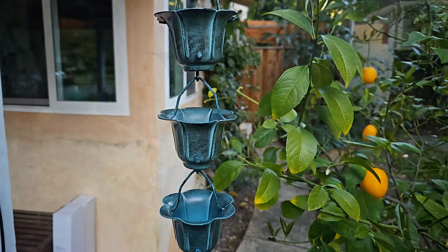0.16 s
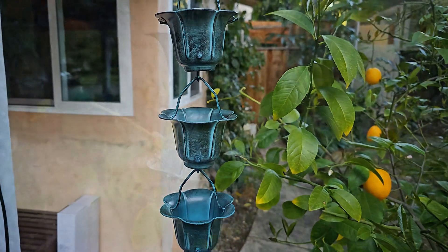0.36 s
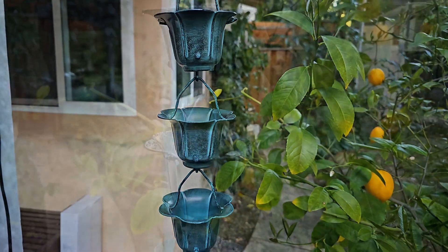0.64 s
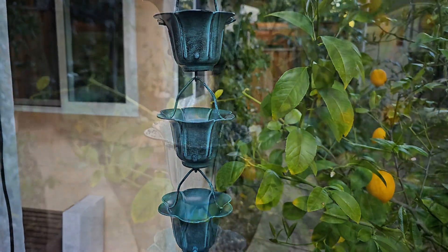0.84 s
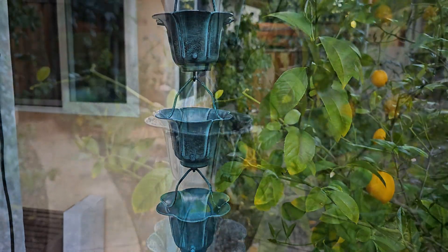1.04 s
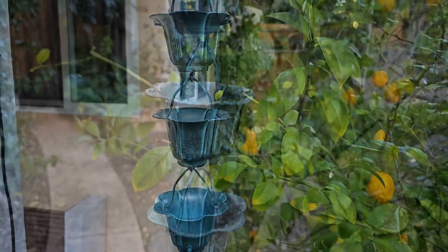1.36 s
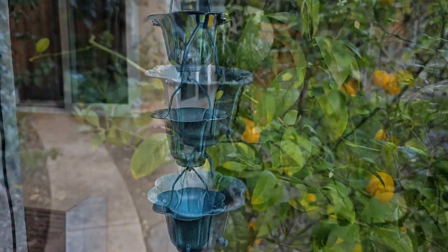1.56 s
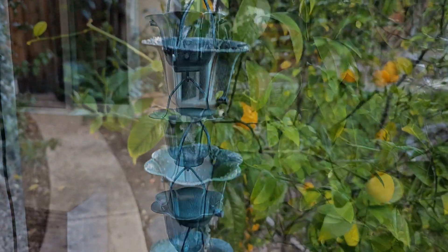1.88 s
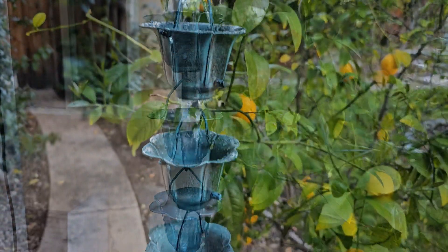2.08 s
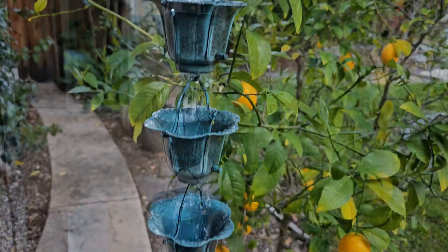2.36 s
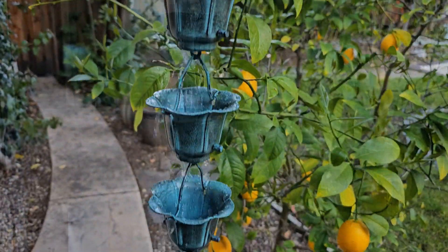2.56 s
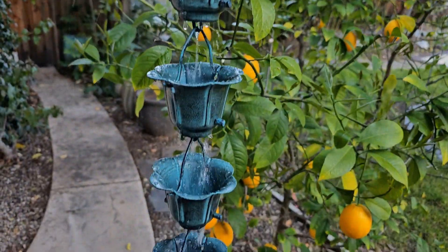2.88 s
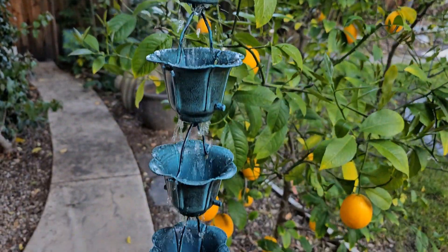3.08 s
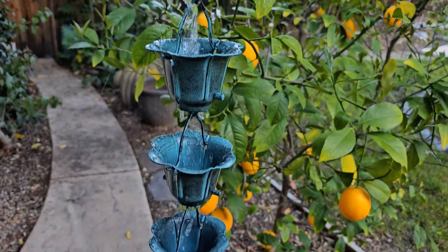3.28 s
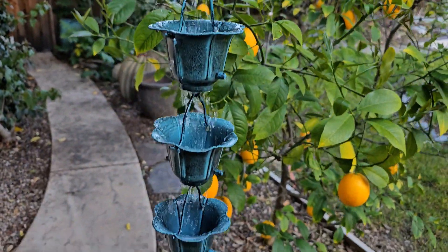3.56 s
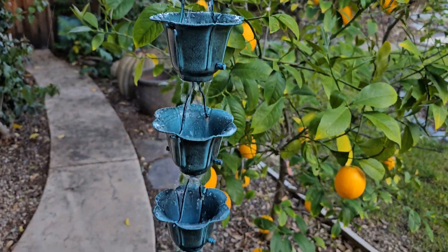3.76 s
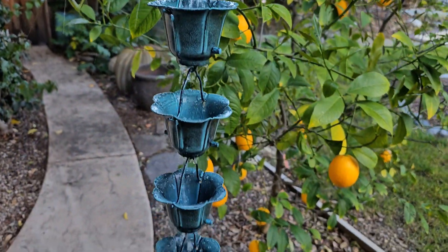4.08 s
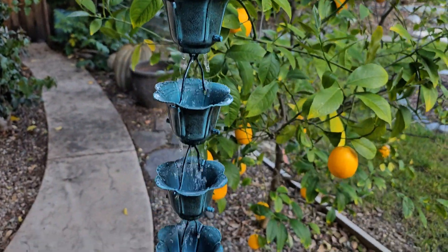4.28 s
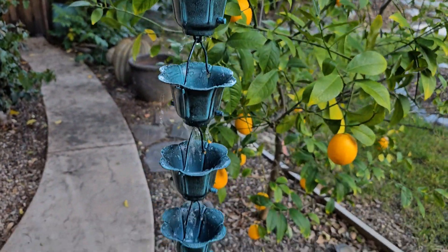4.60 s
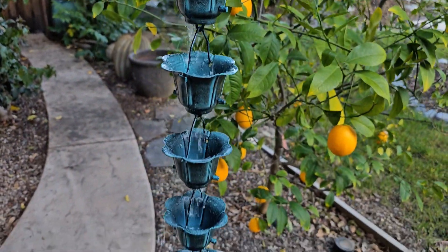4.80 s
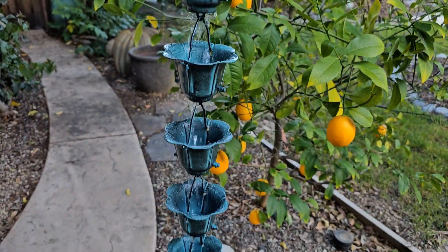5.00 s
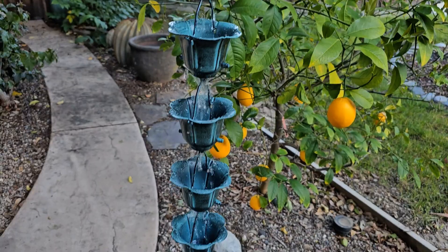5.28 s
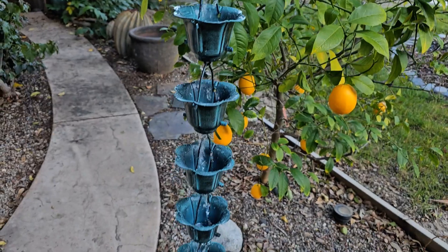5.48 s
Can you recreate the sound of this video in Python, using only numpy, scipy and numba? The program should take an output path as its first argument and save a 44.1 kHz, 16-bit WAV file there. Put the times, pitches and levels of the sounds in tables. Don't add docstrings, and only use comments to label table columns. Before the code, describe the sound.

Close outdoor stereo pickup of water running down a chain of metal cups. Irregular bright drips, tiny rising bubbles, crisp spray ticks and short metallic taps sit over thin pattering hiss. Low air puffs thump on the left in the first two seconds. A distant engine drops in pitch, then rises again, beside a faint drone and town rumble. The water gets busier near the end, with a brief gurgling spill about five seconds in.

```python
import sys
import numpy as np
from scipy import signal
from scipy.fft import rfft, irfft
from scipy.io import wavfile
from scipy.ndimage import uniform_filter1d
from numba import njit

SR = 44100
rng = np.random.default_rng(int(sys.argv[2]) if len(sys.argv) > 2 else 0)


def magnitude_from_level(level_db):
    exponent = np.asarray(level_db, float) / 20
    return 10 ** exponent


def wav_record(signal):
    frames = np.transpose(np.atleast_2d(signal))
    bounded = np.clip(frames, -1, 1)
    quanta = np.round(bounded * 32767).astype(np.int16)
    wavfile.write(sys.argv[1], SR, quanta)


N = 248724

# start_s, peak_db, bubble_hz, left_minus_right_db
CUP_DRIPS = [(0.0864, -45, 5430, 1), (0.105, -41.5, 7800, -9), (0.1241, -54, 8950, -6),
             (0.193, -41.5, 5260, -2), (0.2169, -41.5, 2890, -15), (0.2376, -36, 6370, -5),
             (0.7537, -46, 6050, -10), (1.1655, -50, 6500, -5), (1.3783, -54, 6040, -14),
             (1.426, -45, 6240, -3), (1.9869, -56, 4200, -10), (2.1786, -53, 3522, -6),
             (2.2975, -46, 4460, -6), (2.6549, -53, 7820, -11), (3.1767, -61, 4808, -1),
             (3.1964, -40, 7000, -3), (3.2525, -48, 4188, -1.5), (3.3208, -29, 5270, 5),
             (3.5818, -41, 8147, -12), (3.6704, -53, 7297, -11), (3.7426, -42.5, 4605, 0),
             (3.8134, -47, 5400, 4), (3.8617, -54, 3745, -13), (3.921, -53, 4580, 6),
             (4.1416, -45, 8320, -9), (4.5502, -45.5, 3105, -14), (4.8484, -46, 3784, -11),
             (5.2396, -46, 3080, -1), (5.3799, -43, 4844, 1), (5.6244, -47, 4940, 2)]
# start_s, peak_db, bubble_hz, left_minus_right_db
SPLASHES = [(0.4239, -56, 6100, -2.5), (1.4039, -49, 5840, 0), (1.705, -58, 4723, 3),
            (2.0813, -42, 6300, -4), (2.161, -52, 5200, 0), (2.1976, -40, 6800, -10),
            (2.334, -49.5, 6940, -10), (2.4404, -64, 2774, 0), (2.498, -66, 3207, -2),
            (2.7311, -59, 5616, -1.5), (2.818, -59, 3360, -6), (4.0175, -55, 3274, -2),
            (4.2128, -60, 8330, -6), (4.363, -41, 4670, 0), (4.4528, -55, 5346, -6),
            (4.7449, -55, 3300, -6), (4.779, -59, 8010, -9.5), (4.82, -48.5, 4294, -9),
            (4.9485, -58, 3164, -10), (4.978, -58, 3040, -10), (1.4165, -49.5, 7500, -15),
            (2.228, -48, 7060, -2), (4.9033, -67, 6750, -3), (5.123, -54, 3000, -8),
            (.175, -52, 8100, -9), (5.4172, -53, 5170, -2), (5.5373, -58, 3870, -10)]
# start_s, peak_db, pitch_hz, left_minus_right_db
SPRAY_TICKS = [(0.162, -55, 11600, -6), (0.378, -54, 12060, -9), (0.5168, -54, 12900, -8),
               (0.7082, -41, 15700, 4), (0.8332, -48.5, 13000, -8), (0.8754, -49, 15150, 5),
               (0.937, -43, 14700, -5), (1.1653, -48, 14760, -5), (1.4163, -58, 11000, -15),
               (1.587, -45, 15500, 2), (1.6397, -47.5, 11700, -9), (1.8991, -55, 12860, -12),
               (2.0791, -52, 15420, -4), (2.1969, -48, 15400, 5), (2.226, -48, 15400, -3),
               (2.272, -56, 11300, -14), (2.9047, -47.5, 12710, -4), (2.9425, -42, 15300, 5),
               (3.0081, -45, 15640, 5), (3.1967, -53, 13400, -4), (3.5821, -45, 14610, -3),
               (3.8676, -47, 14230, -4), (3.9936, -44, 15400, 1), (4.3635, -44, 14980, .5),
               (4.704, -42, 14200, 1), (5.1243, -45, 15700, .5), (5.1692, -49, 15300, -2),
               (5.239, -52, 14600, -2), (5.2642, -55, 11920, -5), (5.4412, -47, 14080, -6)]
# start_s, peak_db, pitch_hz, left_minus_right_db
GLUG_BUBBLES = [(0.216, -42, 1590, 4), (3.3214, -39, 6470, -10), (3.3898, -46, 1695, -.5),
                (1.9885, -51, 3850, -10), (3.254, -45, 4235, -3), (3.7434, -48.5, 3846, -8),
                (3.7463, -49, 4800, 1), (3.8144, -42, 5380, 5), (4.849, -57, 3582, -9),
                (.2385, -48, 6560, -11), (4.376, -48, 1720, -9), (4.4525, -48, 1669, -2.5),
                (4.549, -48, 2097, -11), (5.014, -46.5, 1500, -4.5), (5.0381, -49, 3353, -13),
                (5.0604, -49, 3290, -11), (5.089, -50, 3455, -14), (5.1563, -49, 3230, -16),
                (2.2965, -46, 3480, -9), (5.0639, -46, 2068, -14), (5.0882, -46, 1851, -6),
                (5.1063, -44, 2031, -18), (5.1232, -43, 2000, -9), (5.156, -45, 2120, -12),
                (3.3208, -39.5, 4680, 0), (5.184, -46, 1546, -2.5), (5.452, -50.5, 2000, -11)]
# start_s, peak_db, pitch_hz, left_minus_right_db, ring_ms
RIM_RINGS = [(2.588, -60, 5500, 1, 64), (2.5, -52, 11500, -14, 19.4), (0.32, -52, 10200, -7, 15),
             (4.736, -51, 12800, 4, 25), (2.523, -57.5, 13000, -12, 18), (.134, -57, 13500, 0, 14),
             (0.36, -58, 11600, -8, 14), (0.35, -53, 12400, -8, 16), (.424, -64, 11600, -6, 14),
             (.483, -59, 11700, -10, 14), (.517, -52, 12900, -6, 20), (0.93, -58, 6000, -6, 22),
             (1.705, -56, 4700, 2, 37), (1.8, -52, 4680, -4, 12.3), (2.2, -51, 6900, -8.5, 33),
             (3.196, -52.5, 6140, -4, 11), (3.455, -61, 6200, -3, 20.6), (3.672, -56.5, 7300, -10, 33.5),
             (5.28, -52, 12050, -6, 15.8), (5.623, -51, 5400, 5, 14), (3.324, -53, 5250, 2, 59.4),
             (1.166, -58.5, 6300, -4, 26)]
# start_s, peak_db, low_hz, high_hz, left_minus_right_db
EARLY_TAPS = [(0.0868, -58, 8500, 15700, -13), (0.1242, -50, 5560, 13500, -14),
              (0.1931, -44, 5500, 11000, -12), (0.2175, -49, 3500, 15700, -1),
              (0.2524, -44, 2200, 5500, -3), (0.424, -55, 3500, 15700, 0), (0.5193, -50, 3500, 11000, -2),
              (0.644, -51, 2200, 8500, -5), (0.653, -52, 2220, 8500, -7), (0.66, -45, 3500, 15700, -4),
              (0.7089, -53, 3500, 11000, -1), (0.8945, -43, 8500, 15700, -4),
              (1.0157, -51, 8500, 13400, -10), (1.1655, -43.5, 11000, 13500, -13),
              (1.4043, -52, 3500, 11000, 2), (1.4258, -53, 8500, 15700, -11),
              (1.5614, -45, 8500, 15720, -5), (1.7999, -49, 8540, 15700, -2),
              (1.8992, -53, 13500, 15700, -14), (1.9107, -50, 11000, 15700, -12),
              (2.0164, -50, 5500, 15700, 3), (2.0873, -48, 3500, 10980, 1), (2.112, -48, 3500, 5500, 1),
              (2.1619, -47, 2200, 5500, -5), (2.1885, -45, 3500, 8500, 4), (2.1977, -44, 8500, 13500, -4),
              (2.228, -48, 3500, 13500, -13), (2.2419, -49, 11000, 15700, 8),
              (2.2718, -42, 11000, 13500, -14), (2.2963, -47, 3502, 11000, -5),
              (2.3088, -51, 2200, 5500, -3), (2.3336, -47, 5500, 11000, -14),
              (2.3556, -50, 5500, 13500, -14), (2.44, -50, 2200, 10960, 8), (2.4938, -47, 11020, 15700, -9),
              (2.5238, -58, 8500, 11030, -14), (2.7318, -53, 3500, 8500, 5), (2.819, -53, 2198, 5500, -2),
              (2.9368, -51, 11000, 15730, 7), (3.0785, -48, 8485, 13500, 1)]
# start_s, peak_db, low_hz, high_hz, left_minus_right_db
LATE_TAPS = [(3.1414, -52, 8500, 11010, -8), (3.1628, -49, 11000, 15700, 6), (3.1775, -48, 3495, 8500, 2),
             (3.3469, -47, 3475, 10970, -3), (3.3767, -48, 11000, 15700, -2), (3.4099, -49, 2200, 15700, 1),
             (3.5823, -40, 2198, 13470, -11), (3.6712, -49, 5500, 15700, -12),
             (3.743, -53, 8470, 10960, -14), (3.7505, -52, 2200, 3500, -7), (3.7605, -49, 2200, 15700, 8),
             (3.8687, -56, 3503, 5500, -4), (3.9211, -52, 5515, 15700, 2), (4.0168, -42, 3500, 15700, -4),
             (4.0343, -45, 11000, 15700, -7), (4.0876, -51, 8500, 13410, 8), (4.174, -51, 5475, 10990, -5),
             (4.2139, -50, 2200, 13500, -10), (4.2647, -48, 11050, 15700, 8),
             (4.3641, -50, 2195, 3500, -12), (4.3703, -50, 13500, 15700, 7.5), (4.376, -46, 2200, 3500, -8),
             (4.383, -48, 3500, 8500, 2), (4.4539, -51, 2200, 11000, -4), (4.5498, -50, 3513, 11020, -3),
             (4.608, -49, 2195, 5500, -8.5), (4.6588, -54, 3494, 8495, 7), (4.7986, -46, 8500, 15700, -10),
             (4.8485, -47, 2200, 3520, -13), (5.0717, -45, 3500, 15720, 1), (5.1252, -40, 3500, 13500, -5),
             (5.1573, -45, 3504, 5500, 3), (5.1697, -43.5, 2200, 11000, -8), (5.1827, -46, 2200, 13500, -9),
             (5.2296, -47, 2200, 15680, -9), (5.2391, -44.5, 2200, 11000, -11),
             (5.265, -52, 13500, 15700, 3), (5.3808, -50, 2200, 8490, -5), (5.4266, -45, 8500, 15700, -5),
             (5.4855, -49, 2200, 15670, -5)]
# time_s, level_db
CUP_SPILL = [
    (4.96, -70),
    (5.03, -59),
    (5.13, -57.5),
    (5.165, -54),
    (5.19, -56),
    (5.22, -69),
]
# start_s, peak_db, sign (direction and share of the push)
AIR_PUFFS = [
    (0.103, -20, 1),
    (0.615, -19, 0.18),
    (1.336, -24, 0.92),
    (1.502, -27.5, -0.91),
    (1.661, -34, -1),
    (1.93, -33, 0.93),
]
# frequency_hz, gain_db
LEFT_PORT = [(800, -7.5), (2600, -6), (3200, -8), (5300, 0), (6800, -8.5), (7300, -0.5), (8700, -11),
             (9600, -25), (10200, -30), (11000, -18), (11900, 2.5), (12400, -6), (13600, 2), (15600, 6)]
# frequency_hz, gain_db
RIGHT_PORT = [(800, -38), (3100, -6), (4900, -6), (5500, -1), (6300, 2), (6900, -0.5), (7400, 7),
              (8200, 4.5), (8800, 0.5), (9700, 0.5), (10150, -11), (10500, -2.5), (11600, 8), (13000, 0)]
# time_s, firing_hz, level_db, overtone_lift_db (its load)
ENGINE_RUN = [(0.0, 92.04, -37.5, -12), (0.3, 84, -41.5, -3), (0.7, 68, -50.5, 8.5),
              (0.84, 65.6, -37.5, -17.5), (1.0, 60.4, -57.5, 7.5), (1.26, 62.04, -39, -3.5),
              (1.42, 63.57, -34.5, 3), (1.58, 64.2, -30.5, -8.5), (1.82, 69.3, -45.5, 14),
              (2.05, 70.9, -41.5, 6), (2.22, 73.5, -31.5, -6.5), (2.66, 79, -45, 3), (3.2, 84.72, -42, 6),
              (3.6, 88.4, -36.5, 0.5), (4.2, 90.9, -37, -12), (5.06, 96.27, -37, -5),
              (5.3, 92.4, -34.5, -9.5), (5.64, 80.14, -38.5, 3)]
# frequency_hz, gain_db
EXHAUST_COLOUR = [(60, -0.5), (69, -18), (78, 1), (115, -7), (137, -1), (180, -19.5), (265, -19),
                  (330, -34.5)]
ENGINE_ORDERS_DB = (0.1, 0, -2.5, -3)
# peak_s, lift_db
DRONE_SWELLS = [
    (.66, 7),
    (2.3, 4.5),
    (3.5, 6),
    (4.2, 4),
    (5.3, 6.5),
]
# frequency_hz, density_db (per Hz)
TOWN_SPECTRUM = [(14, -41), (24, -10), (32, -11), (55, -1), (100, -5), (135, -8.5), (175, -13.5),
                 (265, -14), (340, -25), (800, -25), (1140, -28.5), (1700, -26.5), (2500, -44),
                 (4000, -101)]
# frequency_hz, share (-1..1)
PORT_LIKENESS = [(60, 0.87), (150, 0.66), (300, 0.59), (640, 0.3), (1400, -0.19), (3000, 0.034)]
# centre_s, half_length_s, threshold_lift_db
GATE_DIPS = [
    (.9, .05, 4.5),
    (1.61, .03, 4),
    (1.16, .012, 4),
    (3.335, .012, 5),
]


def unit(x):
    return x / np.sqrt(np.mean(x ** 2))


def curve(rows):
    s, *columns = np.transpose(rows)
    return [np.interp(np.arange(N) / SR, s, c) for c in columns]


def along(rows):
    hz, value = np.transpose(rows)
    bin_hz = np.arange(N // 2 + 1) * SR / N
    return np.interp(np.log(bin_hz + 1), np.log(hz), value)


def colour(x, gain):
    return irfft(rfft(x) * gain, N)


def walk(rate):
    hold = int(SR / rate)
    steps = np.repeat(rng.standard_normal(N // hold + 1), hold)
    return unit(uniform_filter1d(uniform_filter1d(steps, hold), hold)[:N])


def band_noise(x, order, lo_hz, hi_hz):
    return signal.sosfilt(signal.butter(order, [lo_hz, hi_hz], "bandpass", fs=SR, output="sos"), x)


def ports(x):
    return np.array([colour(x[0], magnitude_from_level(along(LEFT_PORT))), colour(x[1], magnitude_from_level(along(RIGHT_PORT)))])


@njit
def bubbles(start, lag, hz, ring, glide, left, right):
    out = np.zeros((2, N + 64))
    for k in range(len(start)):
        phase = 0.
        for i in range(min(int(1.5 * ring[k]), N - start[k])):
            u = i / ring[k]
            phase += min(2 * np.pi * hz[k] * (1 + glide[k] * u) / SR, 2.6)
            v = np.sin(phase) * 19 * u * np.exp(-7 * u)
            out[0, start[k] + i + 8] += left[k] * v
            out[1, start[k] + i + lag[k]] += right[k] * v
    return out[:, 8:N + 8]


def plink(s, db, hz, pan_db, ring_ms, glide):
    ring = np.clip(ring_ms, .3, 80) * SR / 1000 + 0 * hz
    lag = np.where(db > -37, 8, rng.integers(0, 17, size=len(s)))
    start = np.clip(s * SR, 0, N - 1).astype(np.int64)
    start_hz = hz * (1 - 0.21 * glide)
    return bubbles(start, lag, start_hz, ring, glide + 0 * hz, magnitude_from_level(db + pan_db / 2), magnitude_from_level(db - pan_db / 2))


def bursts(s, db, t60):
    kick = np.zeros(N)
    np.add.at(kick, (s * SR).astype(int), magnitude_from_level(db))
    return signal.lfilter([1], [1, -np.exp(-np.log(1000) / (t60 * SR))], kick)


def droplets(s, db, hz, pan_db, spread_s, spread_oct, cycles):
    late, pitch, size = rng.random((len(s), 24, 3)).T
    delay = -spread_s * np.log(1 - late)
    f = np.clip(hz * 2 ** (spread_oct * (2 * pitch - 1)), 1500, 15700).ravel()
    level_db = (db - 1.5 * delay / spread_s - 10 * size).ravel()
    start = (s + 0.0026 + delay).ravel()
    pan = (pan_db + 0 * delay).ravel()
    return plink(start, level_db, f, pan, cycles * 1000 / f, glide=0.17)


def drop_impacts(rows, click_db, tail_db, cycles, glide):
    s, db, hz, pan_db = np.transpose(rows)
    tail_db = tail_db - 0.53 * (db + 32.0)
    click = bursts(s, db + click_db, t60=0.0081) * rng.standard_normal((2, N))
    mist = bursts(s, db + tail_db, t60=.08) * rng.standard_normal((2, N))
    splash = droplets(s, db + tail_db - 5.5, hz, pan_db, spread_s=0.019, spread_oct=0.472, cycles=44)
    return plink(s, db, hz, pan_db, cycles * 1000 / hz, glide) + splash + ports(click + mist)


def drips():
    in_cup = drop_impacts(CUP_DRIPS, click_db=-9, tail_db=-23, cycles=17, glide=.9)
    splashing = drop_impacts(SPLASHES, click_db=-5, tail_db=-14, cycles=14, glide=.6)
    return in_cup + splashing


def glugs():
    s, db, hz, pan_db = np.transpose(GLUG_BUBBLES)
    ring_ms = 5.4 * (hz / 2000) ** -0.18
    return plink(s, db, hz, pan_db, ring_ms, glide=0.051)


def spray():
    s, db, hz, pan_db = np.transpose(SPRAY_TICKS)
    ticks = plink(s, db + 2.0, hz, pan_db, ring_ms=4.4, glide=0.12)
    return ticks + droplets(s - .002, db - 9, hz, pan_db, spread_s=0.0025, spread_oct=0.26, cycles=51)


def rim_rings():
    return plink(*np.transpose(RIM_RINGS), glide=0.009)


def taps():
    out = np.zeros((2, N))
    t60_s = 0.0071
    fade = magnitude_from_level(-60 * np.arange(256) / SR / t60_s)
    for s, db, lo_hz, hi_hz, pan_db in EARLY_TAPS + LATE_TAPS:
        tap = band_noise(rng.standard_normal((2, len(fade))) * fade, 2, lo_hz, min(hi_hz, 20000))
        tap = tap / abs(tap).max(axis=1, keepdims=True)
        tap = tap * magnitude_from_level([[db + pan_db / 2], [db - pan_db / 2]])
        out[:, int(s * SR):][:, :len(fade)] += tap
    return out


def fizz(count, lo_hz, hi_hz, cycles, scatter_db, glide):
    s, pitch, size, side = rng.random((count, 4)).T
    hz = lo_hz * (hi_hz / lo_hz) ** pitch
    db = -scatter_db * np.log(1 - size)
    return unit(plink(s * N / SR, db, hz, 16 * (side - .5), cycles * 1000 / hz, glide))


def stray_ticks():
    ticks = fizz(count=600, lo_hz=3010, hi_hz=13900, cycles=9, scatter_db=1.5, glide=1.2)
    return ports(ticks) * magnitude_from_level(-74)


def trickle():
    flow_db = -69 + 0.27 * np.arange(N) / SR
    spill_db, = curve(CUP_SPILL)
    patter = fizz(count=9000, lo_hz=2536, hi_hz=15500, cycles=53, scatter_db=1.85, glide=0.096)
    hiss = np.diff(rng.standard_normal((2, N + 1)), axis=1) * 0.07 + rng.standard_normal((2, N))
    water = magnitude_from_level(flow_db + walk(9)) * (patter + magnitude_from_level(5.5 + 1.34 * walk(70)) * hiss)
    spill = fizz(count=6000, lo_hz=1500, hi_hz=3670, cycles=12, scatter_db=0.5, glide=0.13)
    gurgle = magnitude_from_level(spill_db) * spill * magnitude_from_level([[-2.5], [2.5]])
    return ports(water + magnitude_from_level(spill_db - 9.0) * hiss) + gurgle


def air():
    out = np.zeros((2, N))
    t = np.arange(SR // 2) / SR
    cycles = 6.6 * t + 0.74 * (1 - np.exp(-t / 0.015))
    thump = np.sin(2 * np.pi * cycles) * (np.exp(-t / 0.067) + .5 * np.exp(-t / 0.18))
    for s, db, sign in AIR_PUFFS:
        out[:, int(s * SR):][:, :len(t)] += sign * magnitude_from_level(db) * thump * np.array([[1], [-.08]])
    shake_db = -43.5 - 325 * np.clip(np.arange(N) / SR - 2.43, 0, .1)
    both = band_noise(rng.standard_normal(N), 2, 9, 26)
    own = band_noise(rng.standard_normal((2, N)), 2, 9, 26)
    return out + magnitude_from_level(shake_db) * unit(both + 0.4 * own)


def engine():
    hz, level_db, load_db = curve(ENGINE_RUN)
    turn = 2 * np.pi * np.cumsum(hz * (1 + 0.00911 * walk(14))) / SR
    pipe_hz, pipe_db = np.transpose(EXHAUST_COLOUR)
    tone = 0
    for k, fading_db in enumerate((0.89, 1.06, 0.62, 1.694)):
        exhaust_db = np.interp(np.log((k + 1) * hz), np.log(pipe_hz), pipe_db)
        db = level_db + ENGINE_ORDERS_DB[k] + (k > 0) * load_db + exhaust_db
        waver_db = walk(14) + fading_db * walk(6.06)
        tone = tone + np.sqrt(2) * magnitude_from_level(db + waver_db) * np.sin((k + 1) * turn + k)
    return tone * magnitude_from_level([[.4], [-.4]])


def hum():
    t, swell_s = np.arange(N) / SR, 0.065
    lift_db = sum(db * np.exp(-((t - s) / swell_s) ** 2) for s, db in DRONE_SWELLS)
    return unit(band_noise(rng.standard_normal(N), 1, 127, 137)) * magnitude_from_level(-52.5 + lift_db)


def town():
    mid, side = rng.standard_normal((2, N))
    alike = np.clip(along(PORT_LIKENESS), -.99, .99)
    spectrum = magnitude_from_level(along(TOWN_SPECTRUM))
    mid = colour(mid, spectrum * np.sqrt(1 + alike))
    side = colour(side, spectrum * np.sqrt(1 - alike))
    return unit(np.array([mid + side, mid - side])) * magnitude_from_level(-43.5 + 0.06 * walk(1.7))


def whine():
    centre_hz, width_hz = 7990, 30
    whistle = band_noise(rng.standard_normal((2, N)), 1, centre_hz - width_hz / 2, centre_hz + width_hz / 2)
    return unit(whistle) * magnitude_from_level([[-74], [-101]]) * magnitude_from_level(1.8 * walk(8.6))


def drop_faint_bands(x):
    z = signal.stft(np.array([x[0] + x[1], x[0] - x[1]]) / np.sqrt(2), nperseg=1024)[2]
    bands = z[:, :512].reshape(2, 128, 4, -1)
    power = uniform_filter1d(np.mean(abs(bands) ** 2, axis=2, keepdims=True), size=3, axis=3)
    band_db = 10 * np.log10(power + 1e-20)
    frame = np.arange(z.shape[2]) * 512
    wander = np.tanh(np.interp(frame, np.arange(N), walk(16)))
    dip_db = sum(db * (abs(frame / SR - s) < half_s) for s, half_s, db in GATE_DIPS)
    own = uniform_filter1d(rng.standard_normal(band_db.shape), size=9, axis=3) * 3
    gate_db = -96.8 + dip_db + 2.8 * wander + 2.2 * own
    keep = 1 / (1 + magnitude_from_level(6 * (gate_db - band_db)))
    z[:, :512] = (bands * keep).reshape(2, 512, -1)
    mid, side = signal.istft(z, nperseg=1024)[1][:, :N]
    return np.array([mid + side, mid - side]) / np.sqrt(2)


def scene():
    chain = drips() + glugs() + spray() + rim_rings() + taps() + stray_ticks() + trickle()
    return chain + air() + engine() + hum() + town() + whine()


def band_limit(x):
    return signal.sosfilt(signal.butter(12, 16670, fs=SR, output="sos"), x)


def record(dry):
    top_cut = signal.ellip(10, .2, 60, 15680, fs=SR, output="sos")
    mix = signal.sosfilt(top_cut, drop_faint_bands(dry))
    return band_limit(mix)


dry = scene()
out = record(dry)
wav_record(out)
```